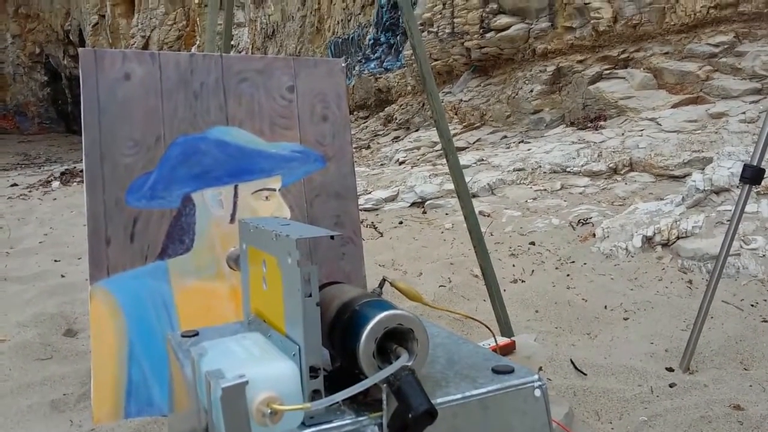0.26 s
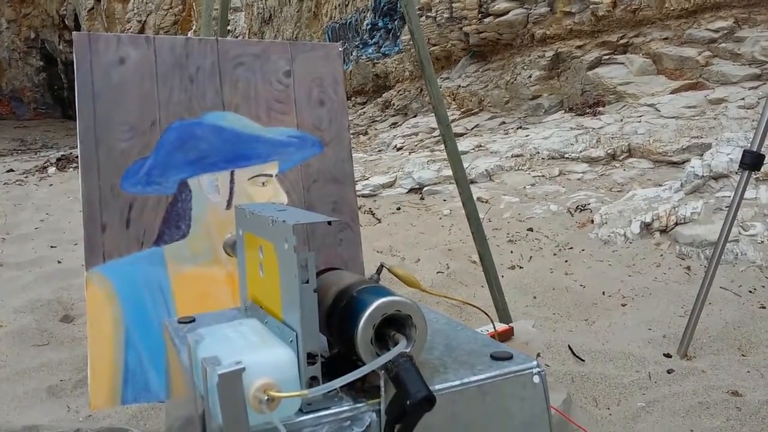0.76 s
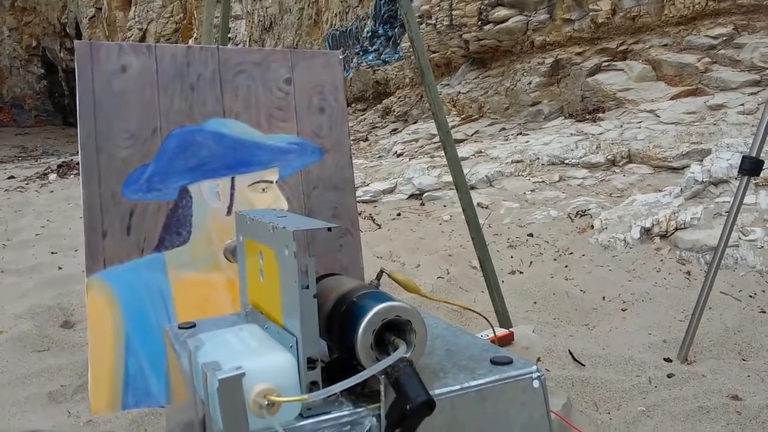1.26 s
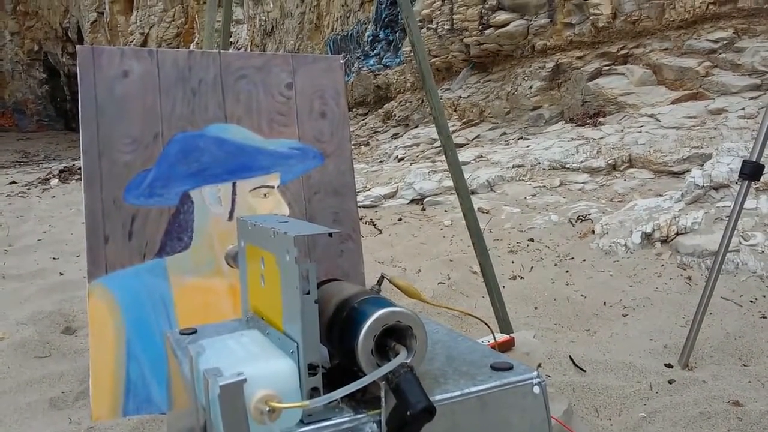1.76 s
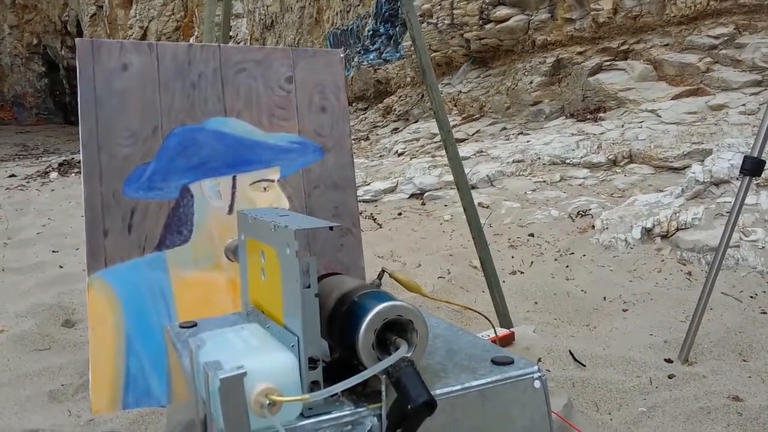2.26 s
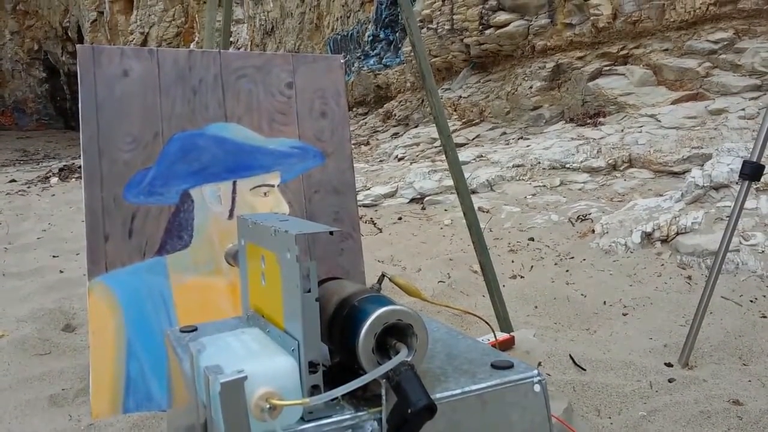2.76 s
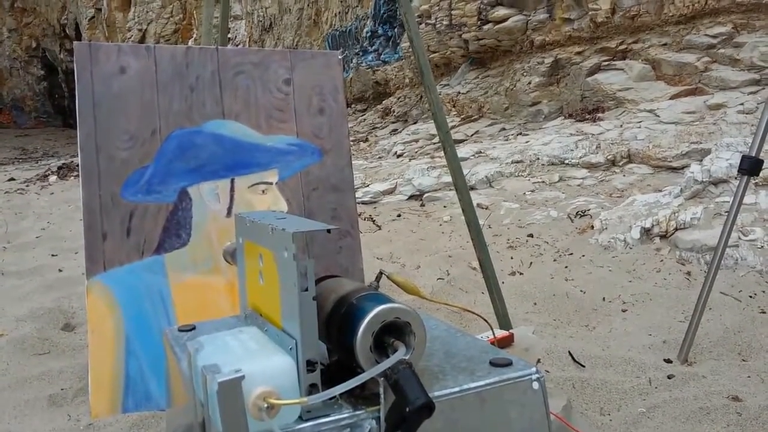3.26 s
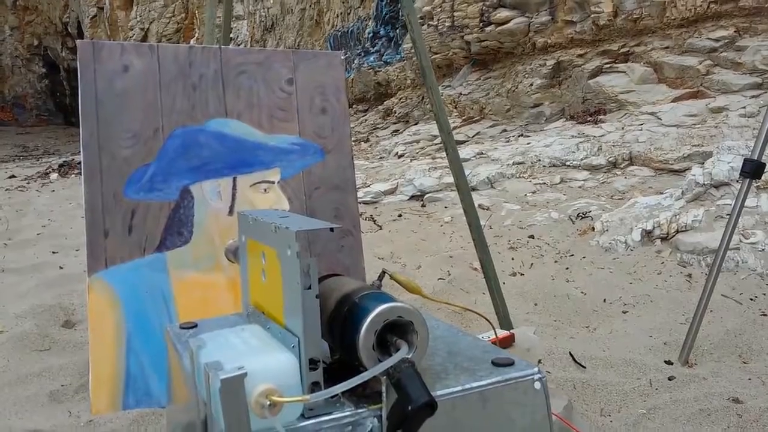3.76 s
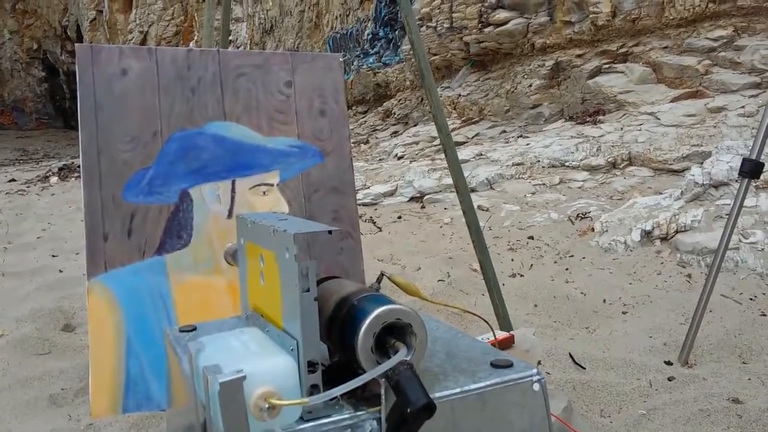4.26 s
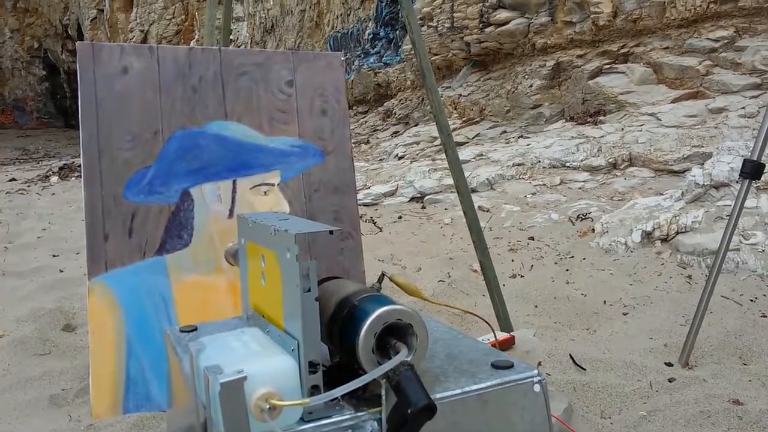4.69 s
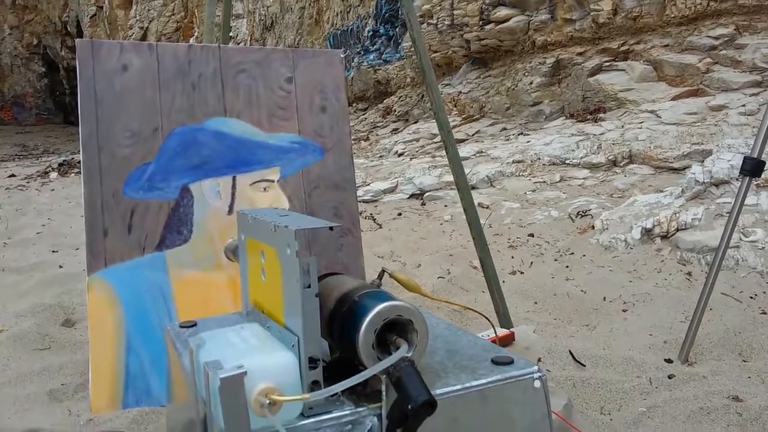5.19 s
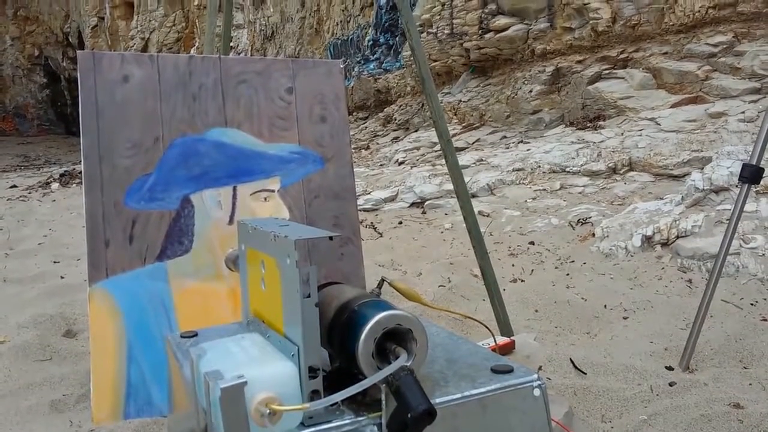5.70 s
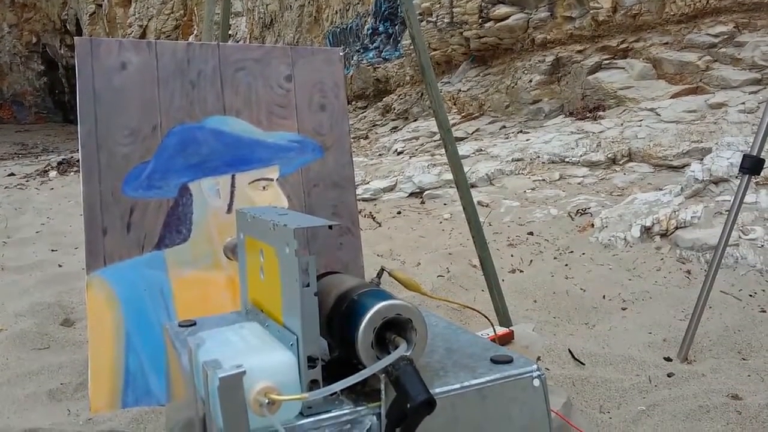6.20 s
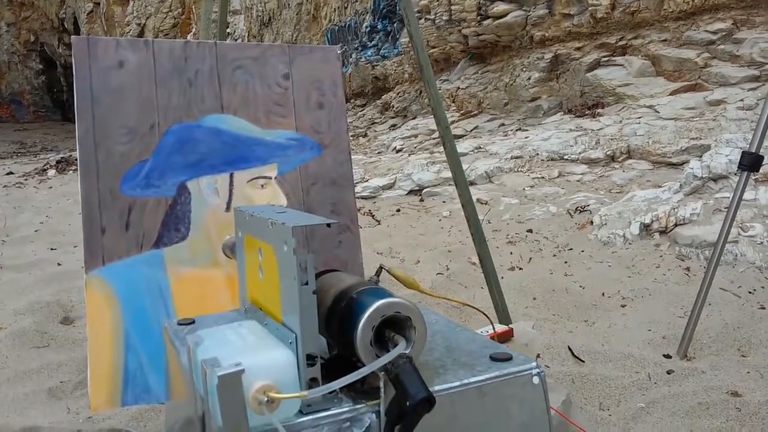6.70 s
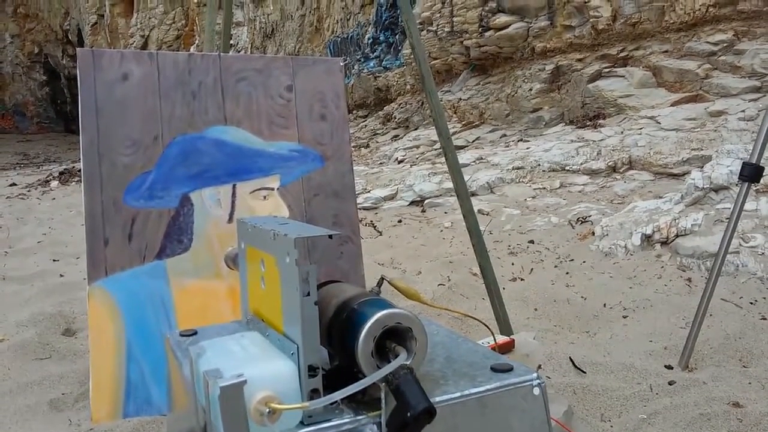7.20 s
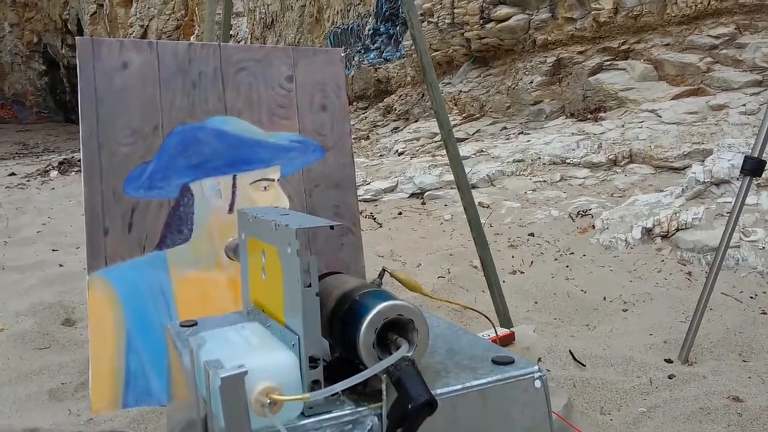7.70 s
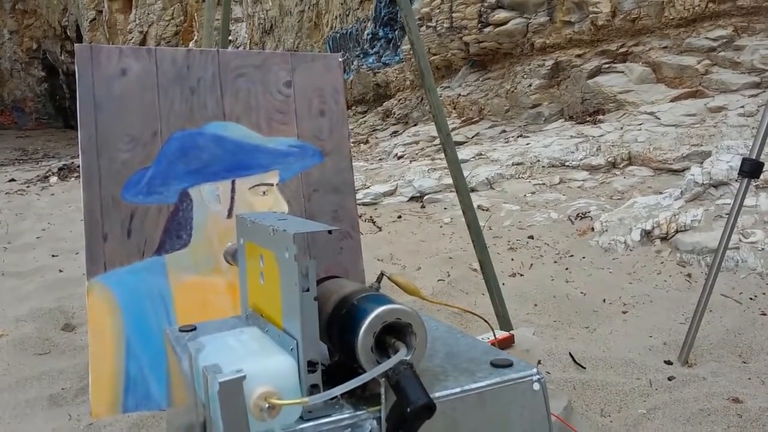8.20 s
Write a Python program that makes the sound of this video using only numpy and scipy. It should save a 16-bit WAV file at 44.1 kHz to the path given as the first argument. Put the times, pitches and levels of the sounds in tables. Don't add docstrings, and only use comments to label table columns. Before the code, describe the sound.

Outdoors on sand beneath a cliff, close stereo camera sound with low, bumping wind and faint distant surf. Throughout, bright dry spark ticks come ten times a second, varying in loudness, and air puffs arrive about every 0.57 s, each a third of a second of sharp hiss with a softer pipe roar, cut off abruptly. Faint low thuds at 0.1 and 0.3 s precede a hard, deep pop at 0.63 s; weak misfires follow at 0.9 and 1.4. At 2.3 s a pop catches into about eight very rapid firings, a tiny rasping burst growing stronger, over in some 30 ms. A softer pop comes at 3.0, a strong double-edged one at 4.8, the loudest at 6.4. Each gets a short dull cliff echo, and the background ducks afterwards. Small valve ticks fall near 3.6 and 4.7. From 7.6 s only puffs, ticks and faint thuds remain, until about 8.4.

```python
import sys
import numpy as np
from scipy import signal
from scipy.fft import rfft, irfft, next_fast_len
from scipy.io import wavfile
from scipy.ndimage import uniform_filter1d

SR = 44100
rng = np.random.default_rng(int(sys.argv[2]) if len(sys.argv) > 2 else 0)


def rack_gain(trim_db):
    fader = np.asarray(trim_db, float)
    return 10 ** (fader / 20)


def wav_record(signal):
    frames = np.transpose(np.atleast_2d(signal))
    bounded = np.clip(frames, -1, 1)
    quanta = np.round(bounded * 32767).astype(np.int16)
    wavfile.write(sys.argv[1], SR, quanta)


N = 372625
SIZE = next_fast_len(N)
HZ = np.maximum(np.fft.rfftfreq(SIZE, 1 / SR), 1)
T = np.arange(N) / SR

# start [s], level [dB], first swing [Hz], late swing [Hz], swell [ms].
POP_EVENTS = [
    (0.6334, 0, 222, 95.9, 4.25),
    (2.2861, 0.5, 198.8, 136.8, 3.9),
    (3.0298, -3, 215, 105.4, 3.8),
    (4.805, -9, 213.2, 166.6, 3.2),
    (4.808, 0.5, 235, 108.6, 5.2),
    (6.4413, 3, 186.7, 105, 5.1),
]
# valve shuts [s], length [s], hiss level [dB], roar against hiss [dB].
PUMP_STROKES = [(0.141, 0.37, -23.5, -13.5), (0.716, 0.36, -25, -11), (1.28, 0.34, -32.5, -12),
                (1.85, 0.32, -27, -14), (2.425, 0.35, -25.5, -12), (2.996, .3, -31, -9),
                (3.545, 0.29, -28.5, -9.5), (4.105, .3, -27.5, -12.5), (4.703, .34, -26, -9),
                (5.28, 0.32, -29, -10), (5.846, .29, -27.5, -10.5), (6.436, 0.32, -26.5, -11),
                (6.997, 0.31, -30.5, -13), (7.583, .31, -29, -12.5), (8.171, 0.33, -25, -11.5)]
# time [s], gain for faint sounds [dB], snap of the sparks [dB].
CAMERA_GAIN = [(0.2, 2.5, 2), (0.8, -6.5, -7.5), (1.36, -10, -12), (1.93, 0, -1), (2.5, -3, -10),
               (3.08, -9, -12.5), (3.63, -4, -10), (4.2, 5, -0.5), (4.8, 3, -4), (5.36, -7, -9),
               (5.93, -4.5, -4), (6.5, -10, -8), (7.08, -15, -10), (7.66, -2.5, -7), (8.25, -1, 0)]


def along(table, column):
    table = np.array(table)
    return np.interp(np.log(HZ), np.log(table[:, 0]), table[:, column])


def above(hz):
    return 1 / (1 + (hz / HZ) ** 8)


def walk(rate):
    hold = int(SR / rate)
    steps = np.repeat(rng.standard_normal(N // hold + 1), hold)
    return 1.5 * uniform_filter1d(uniform_filter1d(steps, hold), hold)[:N]


def soft_min(a, b, soft_db):
    return -soft_db * np.logaddexp(-a / soft_db, -b / soft_db)


def decay(u, t60_s):
    return np.exp(-np.log(1000) * u / t60_s)


def pair(colour, lag_s):
    a, b = rfft(rng.standard_normal((2, SIZE)))
    like = np.clip(along(colour, column=3), 0, 1)
    right = like * a * np.exp(-2j * np.pi * HZ * lag_s) + np.sqrt(1 - like ** 2) * b
    return np.array([a * rack_gain(along(colour, column=1)), right * rack_gain(along(colour, column=2))])


def band(spectra, shape, lo_hz, hi_hz):
    inside = spectra.mean(0)[(HZ > lo_hz) & (HZ < hi_hz)]
    return irfft(spectra * shape, SIZE)[:, :N] * SIZE / np.sqrt(2 * np.sum(np.abs(inside) ** 2))


def clicks(rows):
    x = np.zeros(SIZE)
    for s, db in rows:
        x[int(s * SR)] += rack_gain(db)
    return rfft(x)


def sag_db():
    sag_db_per_s, back_s = 29.5, 0.14
    shut, length = np.transpose(PUMP_STROKES)[:2]
    start = np.append((shut - length)[1:], N / SR)
    times = np.transpose([shut, start, start + back_s]).ravel()
    levels = np.transpose([0 * shut, sag_db_per_s * (shut - start), 0 * shut]).ravel()
    return np.interp(T, times, levels)


def shore():
    # frequency in Hz, left in dB, right in dB, likeness of the two sides 0-1.
    shore_colour = [(25.5, -75, -91.5, 0.4), (64, -64.5, -65, 1), (150, -60.5, -60.5, 0.8),
                    (306, -75.5, -74, 0.8), (640, -80, -84, 0.71), (1000, -84, -87, 0),
                    (2050, -95, -100, 0), (4000, -99, -104, 0), (7500, -103, -108, 0.4),
                    (9700, -105, -118, .1), (12500, -104, -104, .1), (15600, -108, -103, .1)]
    # time in s, level in dB.
    wind_rumble = [(0.0, -44.5), (0.45, -41.5), (0.6, -48), (1.03, -45.5), (1.34, -50.5), (1.62, -43),
                   (1.93, -41.5), (2.47, -49), (2.85, -55), (3.55, -45), (4.26, -38.5), (4.82, -39.5),
                   (5.43, -53), (5.98, -51.5), (6.25, -44.5), (6.8, -44.5), (7.22, -54.5), (7.7, -47)]
    gain, sag = np.interp(T, *np.transpose(CAMERA_GAIN)[:2]), sag_db()
    rumble_db = np.interp(T, *np.transpose(wind_rumble))
    wash_db = -59 + 0.88 * gain + 0.19 * sag
    wash_db = wash_db + 0.19 * (rumble_db + 46)
    spray_db = -64.5 + 0.92 * gain + 2.4 * sag
    sea = pair(shore_colour, 0)
    out = band(sea, 1 - above(140), 50, 350) * rack_gain(rumble_db + 1.8 * walk(13))
    out += band(sea, above(160) - above(420), 50, 320) * rack_gain(rumble_db + 2.0 * walk(22))
    out += band(sea, above(420) - above(1700), 460, 1300) * rack_gain(wash_db + 2.4 * walk(10))
    out += band(sea, above(1700) - above(7500), 2000, 7400) * rack_gain(-62.5 + gain + sag + 0.72 * walk(23))
    return out + band(sea, above(7500), 9000, 15000) * rack_gain(spray_db + 0.9 * walk(15))


def cliff(x):
    u = np.arange(SR) / SR
    grit = rng.standard_normal((2, SR)) + 3.05 * rng.standard_normal(SR)
    late = 1 - np.exp(-(u / 0.014) ** 2)
    slow = rfft(grit * late * decay(u, 0.36), SIZE)
    slow = slow * (1 - above(340)) * above(68) * rack_gain([[-1.5], [1.5]])
    quick = rfft(grit * late * decay(u, 0.22), SIZE)
    quick = quick * above(260) * rack_gain(-0.5) / (1 + (HZ / 2500) ** 2)
    hollow = rfft(grit[::-1, ::-1] * late * decay(u, 1.3), SIZE)
    hollow = hollow * (above(200) - above(300)) * rack_gain(-9)
    return irfft(rfft(x, SIZE) * (slow + quick + hollow) * rack_gain(-55), SIZE)[:, :N]


def spark_train(count):
    first_s, period_s, slowing_s = 0.2013, 0.103312, 7.5e-7
    k = np.arange(-1, count)
    s = first_s + period_s * k + slowing_s * k ** 2
    gain_db = np.interp(s, *np.transpose(CAMERA_GAIN)[::2]) + 0.99 * np.interp(s, T, sag_db())
    return list(zip(s, -29 + gain_db))


def sparks():
    # frequency in Hz, level in dB.
    snap_colour = [(500, -38.5), (1500, -18), (4000, -9), (7000, -11.5), (9500, -9), (12000, 1.5),
                   (15000, -2.5), (16800, -5)]
    # delay in ms, left in dB, right in dB.
    rig_paths = [(0, 6, -7), (.25, -12.5, -14.5), (.7, -11, -13.5), (1.0, -10.5, -3), (1.35, -9.5, -9.5),
                 (3.3, -11.5, -21)]
    # time in s, peak in dB.
    valve_ticks = [(3.59, -50), (4.73, -47)]
    colour = rack_gain(along(snap_colour, column=1))
    colour = colour / irfft(colour, SIZE)[0]
    u = np.arange(900) / SR
    scatter = rfft(rng.standard_normal((2, 900)) * np.exp(-u / 0.004) * rack_gain(-28.5), SIZE)
    paths = 0
    for k, (ms, left, right) in enumerate(rig_paths):
        delay = np.exp(-2j * np.pi * HZ * ms / 1000)
        paths = paths + rack_gain([[left], [right]]) * (-1) ** k * delay
    snaps = clicks(spark_train(count=80) + valve_ticks) * colour
    return irfft(snaps * (paths + scatter) * rack_gain(6), SIZE)[:, :N]


def strokes():
    full_share, rise_db, fall_db, round_db = 0.61, 46.5, 35, 3
    open_db_s, shut_db_s, shut_lead_s, shut_soft_db = 500, 1698, 0.0091, 11
    duck_db, duck_s, duck_lead_s = -5, 0.3, 0.013
    rows = np.array(PUMP_STROKES)
    nearest = np.minimum(np.searchsorted(rows[:, 0] + 0.1, T), len(rows) - 1)
    shut, length, level_db, roar_db = rows[nearest].T
    past = 1 - full_share + (T - shut) / length
    flow = soft_min(rise_db * past, -fall_db * past, round_db)
    flow = flow + open_db_s * np.minimum(T - shut + length, 0)
    valve = soft_min(0 * T, shut_db_s * (shut - shut_lead_s - T), shut_soft_db)
    duck = 0
    for s, db, *_ in POP_EVENTS:
        if db > -8:
            dip = duck_db * np.exp(-np.abs(T - s) / duck_s)
            duck = duck + np.where(T > s - duck_lead_s, dip, 0)
    return flow, level_db + valve + duck, roar_db - (1 - 0.87) * valve


def air():
    # frequency in Hz, left in dB, right in dB, likeness of the two sides 0-1.
    jet_colour = [(244, -56.5, -59, 1), (527, -85, -83, 0.2), (1010, -74.5, -77, 0.7),
                  (2100, -84, -86, 0.8), (3100, -85, -91.5, 1), (4790, -73, -78, 0.5),
                  (4860, -83, -81.5, 1), (5530, -76, -82, 0.8), (8100, -65, -81, 0.2),
                  (8640, -64.5, -83, 0.1), (10100, -59.5, -84, .45), (10700, -57.5, -72.5, 0.8),
                  (13900, -56.5, -64.5, .55), (15600, -60.5, -59, .65)]
    # centre in Hz, half width in Hz, share taken out 0-1.
    jet_dips = [(2150, 90, .65), (2820, 90, .65), (5100, 120, .7)]
    flow, level_db, roar_db = strokes()
    level_db = level_db + 0.53 * walk(25)
    hiss_db = soft_min(2.06 * (flow + 11.5), 0.32 * flow, 0.5)
    whistle = 1 + 0.56 / (1 + ((HZ - 7500) / 260) ** 2)
    jet = pair(jet_colour, 1.9e-5) * whistle
    for hz, half_hz, share in jet_dips:
        jet = jet * (1 - share / (1 + ((HZ - hz) / half_hz) ** 2))
    hiss = band(jet, above(5200), 8100, 15640) * rack_gain(level_db + hiss_db)
    intake_db = level_db + roar_db + flow + 0.32 * walk(30)
    intake = band(jet, above(2300) - above(5480), 3000, 5000) * rack_gain(intake_db)
    pipe_db = level_db + roar_db - 5.5 + flow + 2.6 * walk(22)
    return hiss + intake + band(jet, (1 - above(2300)) * above(330), 700, 1800) * rack_gain(pipe_db)


def glides():
    # start in s, level in dB, first Hz, last Hz, length in s.
    sliding_notes = [
        (.634, -20, 1200, 800, .03),
        (3.038, -44, 1100, 920, .04),
        (3.298, -52, 740, 1100, .055),
        (4.82, -49, 1050, 950, .04),
        (6.448, -44, 1090, 850, .035),
    ]
    out = np.zeros(N)
    for s, db, first_hz, last_hz, length in sliding_notes:
        v = np.arange(int(length * SR)) / SR / length
        cycles = length * (first_hz * v + (last_hz - first_hz) * v ** 2 / 2)
        start = int(s * SR)
        out[start:start + len(v)] = rack_gain(db) * np.sin(np.pi * v ** 0.48) * np.sin(2 * np.pi * cycles)
    return out


def swing(s, db, first_hz, late_hz, swell_ms):
    u = np.arange(4000) / SR
    phase = 2 * np.pi * (late_hz * u + (first_hz - late_hz) * 0.0051 * (1 - np.exp(-u / 0.0043)))
    steep = np.sin(phase) + 0.096 * np.cos(2 * phase) - 0.1 * np.sin(3 * phase)
    v = u * 1000 / swell_ms
    out = np.zeros(N + 4000)
    start = int(s * SR)
    out[start:start + 4000] = rack_gain(db) * (v * np.exp(1 - v)) ** 2.4 * steep
    return out[:N]


def catch(count):
    start_s, period_ms, slowing = 2.2948, 3.12, 1.016
    k = np.arange(count)
    chance = rng.standard_normal((count, 3)).T
    ms = np.cumsum(period_ms * slowing ** k) - period_ms + 0.18 * chance[0]
    lack = np.exp(-k / 2.2)
    return np.transpose([start_s + ms / 1000, -7 * lack + 1.5 * chance[1], 1.5 - 11 * lack,
                         -5 + 2.8 * chance[2]])


def pipe():
    # time in s, level in dB, swing in Hz.
    misfires = [(0.104, -27, 106), (0.33, -26, 102), (0.889, -37.5, 107), (1.401, -33.5, 112.6),
                (7.638, -43.5, 110), (7.669, -41, 109), (7.758, -37, 111), (7.808, -40.5, 110),
                (7.838, -41.5, 110), (8.179, -38, 110), (8.255, -32, 108.5)]
    # time in s, level in dB, sharpness in dB, organ tone in dB.
    shock_fronts = [
        (.6333, -5, -10.5, -12),
        (3.0318, -25, -7.5, -6),
        (3.129, -51.5, -12.5, -9),
        (4.8098, -33, -6, 6.5),
        (6.4437, -28.5, -1.5, -5.5),
        (6.574, -50.5, -15, -17.5),
    ]
    # resonance in Hz, level in dB, 60 dB decay in s.
    pipe_modes = [(259.3, -16, 0.3), (293, -17, 0.11), (320, 6, 0.029), (583, -4, 0.026), (893, -15, 0.091),
                  (965, 2.5, .018), (1016, -16.5, 0.11), (1198, -5.5, 0.027), (1546, -5, 0.036),
                  (1830, -9.5, 0.049), (4284, 0, .02)]
    low = sum(swing(*pop) for pop in POP_EVENTS)
    low = low + sum(swing(s - 0.003, db, 1.3 * hz, hz, 3.8) for s, db, hz in misfires)
    s, db, sharp_db, organ_db = np.concatenate([shock_fronts, catch(count=8)]).T
    u = np.arange(12000) / SR
    front = 0.99 * u / 0.00014 * np.exp(1 - u / 0.00025)
    modes = sum(rack_gain(g) * decay(u, t60) * np.sin(2 * np.pi * hz * u) for hz, g, t60 in pipe_modes)
    ring = rfft(front + rack_gain(-10.0) * modes, SIZE)
    sharp = clicks(zip(s, db + sharp_db))
    drive = clicks(zip(s, db + organ_db)) * (1 - above(400))
    drive = drive + clicks(zip(s, db)) * (above(420) - above(2100)) + sharp * above(2600)
    gate = irfft(sharp * rfft(np.exp(-u / 0.0019), SIZE), SIZE)
    spit = rfft(gate * rng.standard_normal(SIZE)) * above(2800) / (1 + (HZ / 7500) ** 4) * rack_gain(2.0)
    return low - irfft(drive * ring + spit, SIZE)[:N]


def scene():
    gas = pipe() + glides()
    top_cut = signal.ellip(12, 0.2, 85, 15720, fs=SR, output="sos")
    steady = signal.sosfilt(top_cut, air() + shore())
    turn = np.exp(-1j * (0.39 + 2 * np.pi * HZ * 5e-5))
    right = irfft(rfft(gas, SIZE) * turn, SIZE)[:N]
    return steady + sparks() + np.array([gas * rack_gain(1.64), right * rack_gain(-0.84)]) + cliff(gas)


def band_limit(x):
    return signal.sosfilt(signal.butter(12, 16880, fs=SR, output="sos"), x)


def record(dry):
    over = np.maximum(np.abs(dry) - 0.65, 0)
    rounded = dry - np.sign(dry) * (over - 0.31 * np.tanh(over / 0.31))
    top_cut = signal.ellip(12, 0.2, 70, 16750, fs=SR, output="sos")
    return band_limit(signal.sosfilt(top_cut, rounded))


dry = scene()
out = record(dry)
wav_record(out)
```